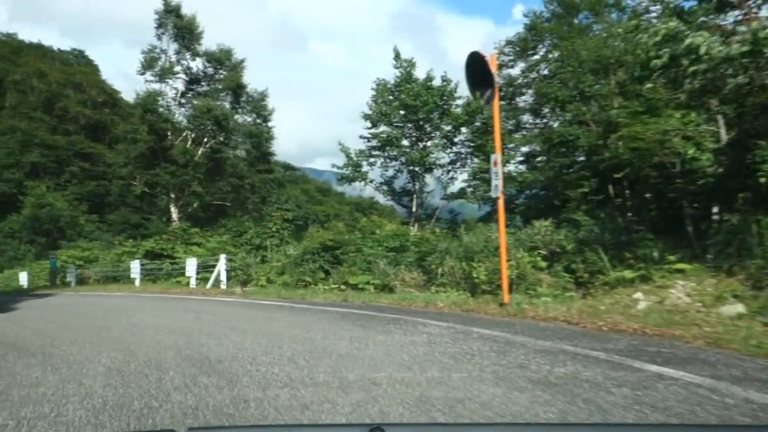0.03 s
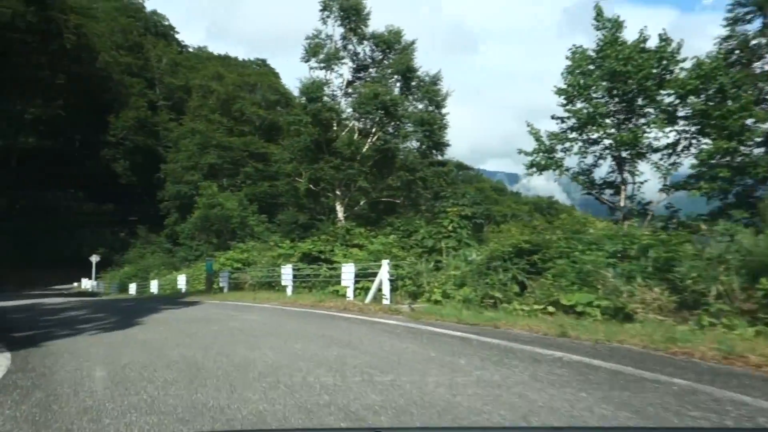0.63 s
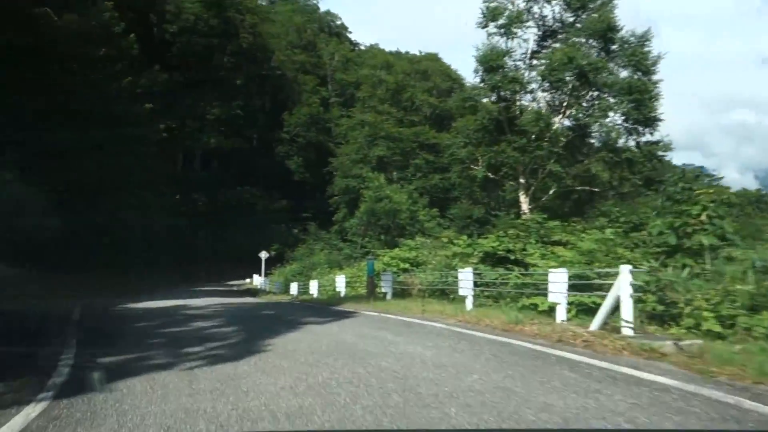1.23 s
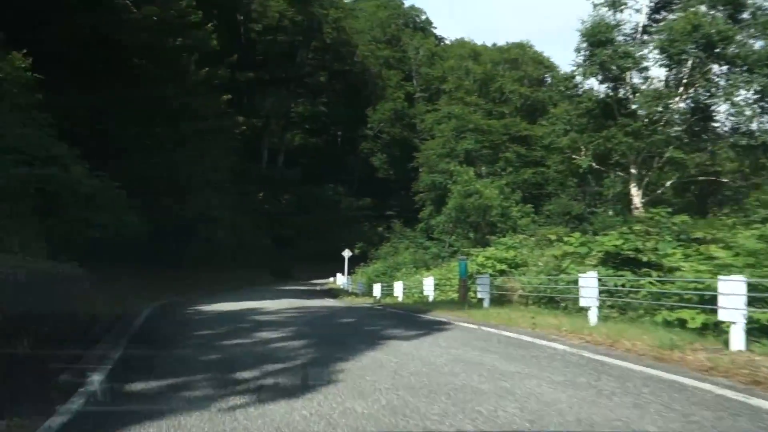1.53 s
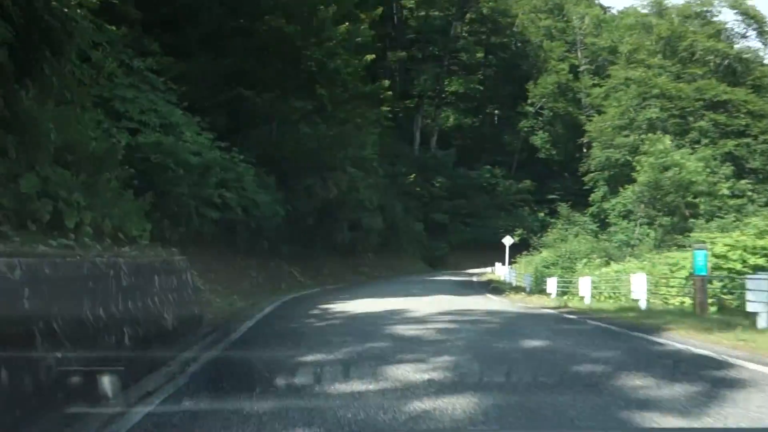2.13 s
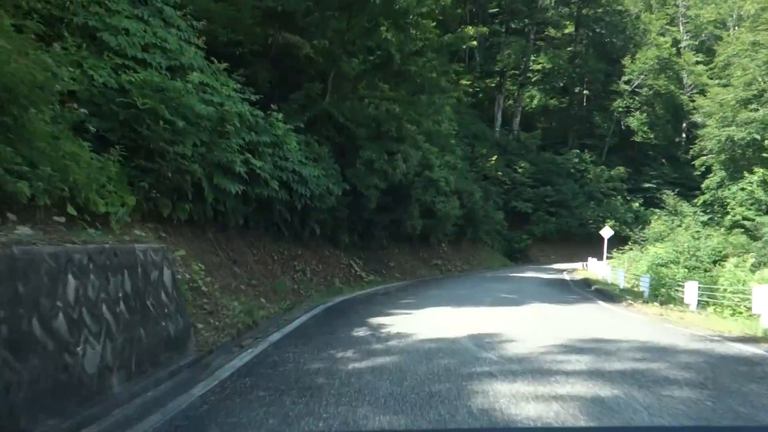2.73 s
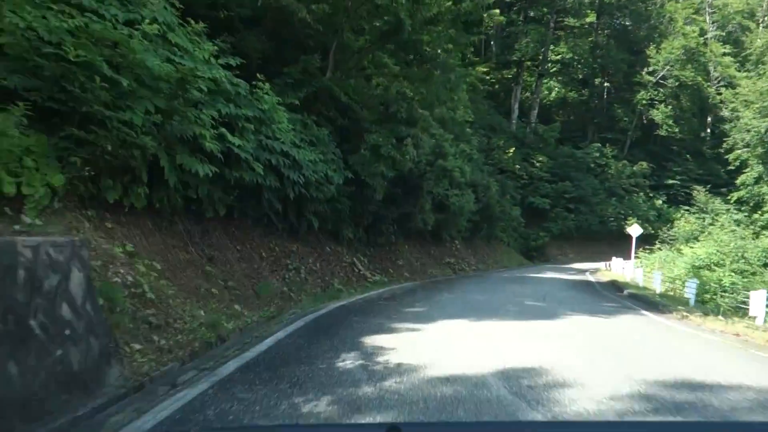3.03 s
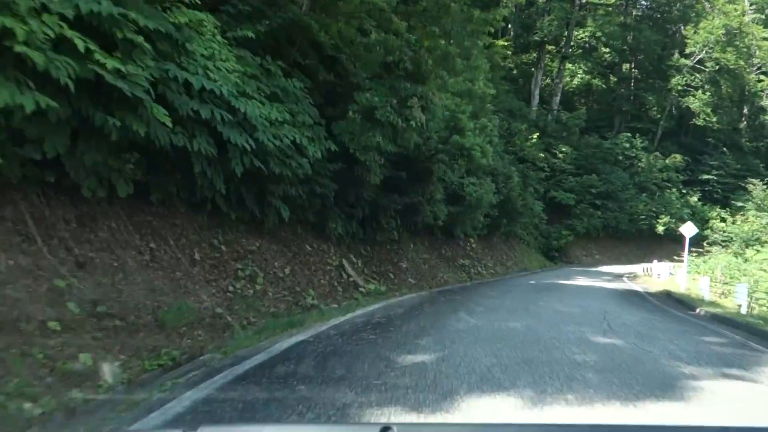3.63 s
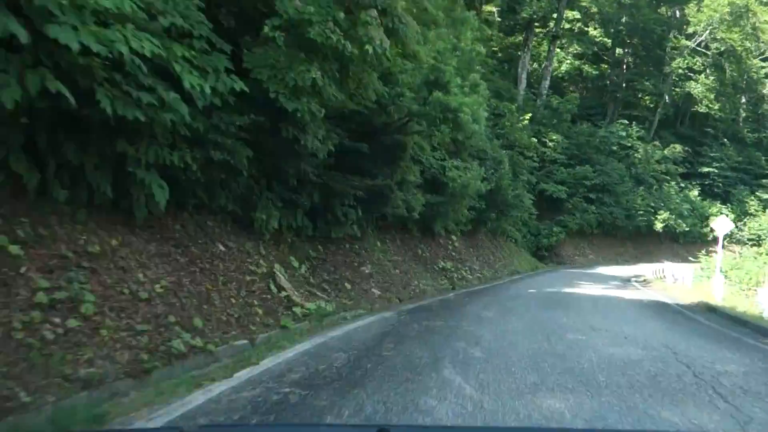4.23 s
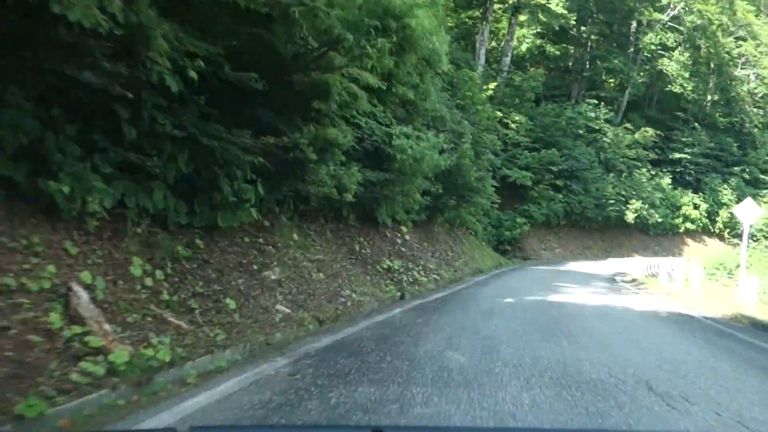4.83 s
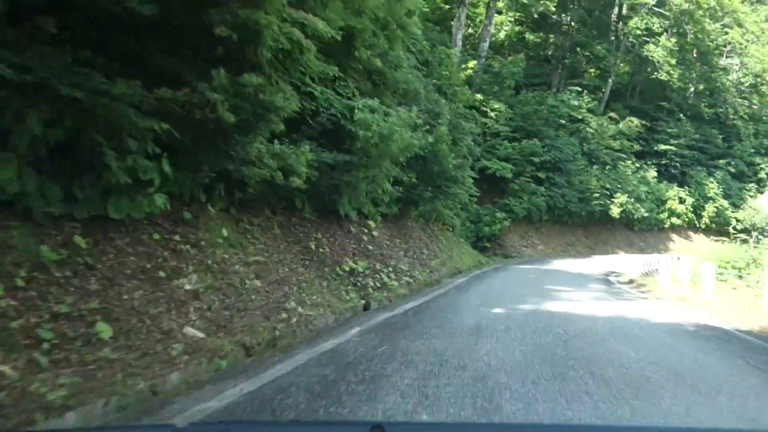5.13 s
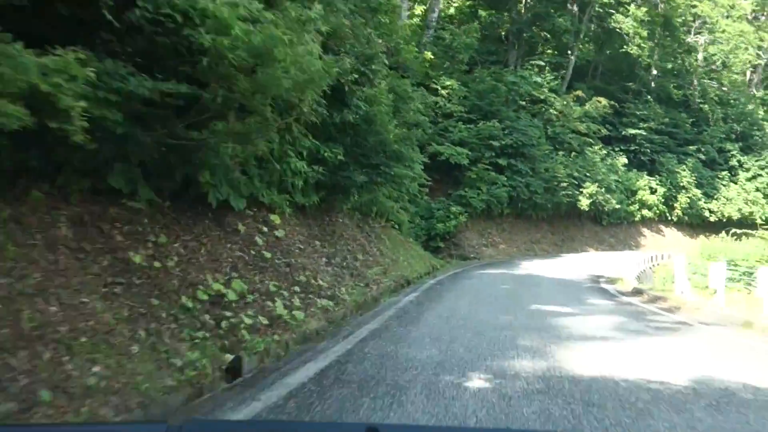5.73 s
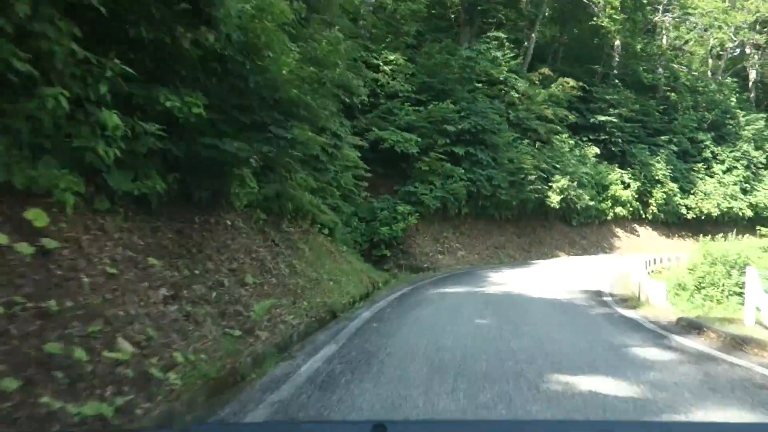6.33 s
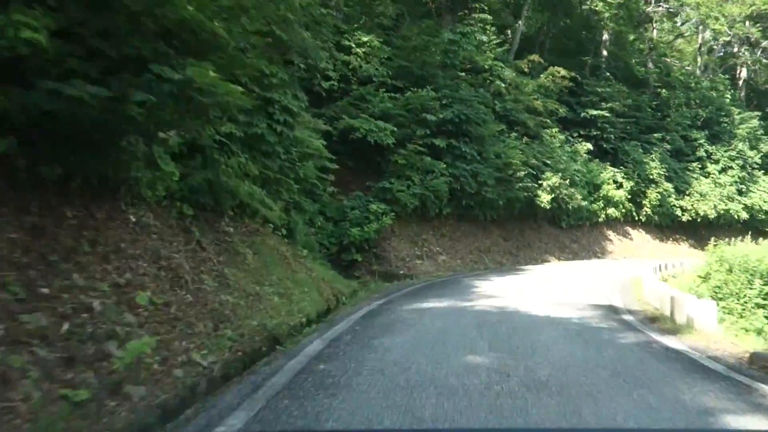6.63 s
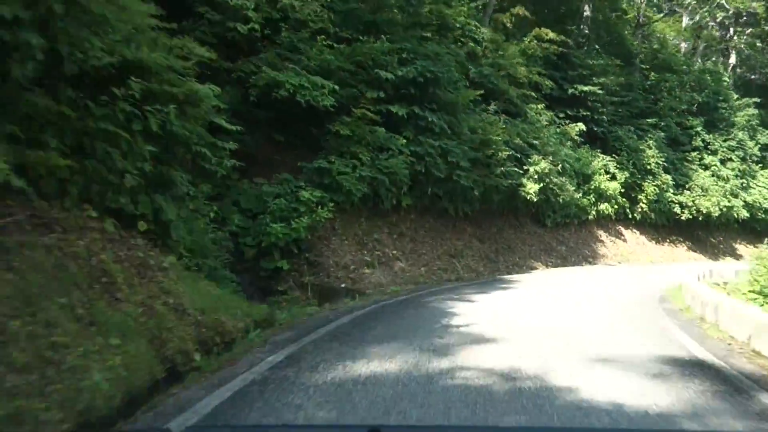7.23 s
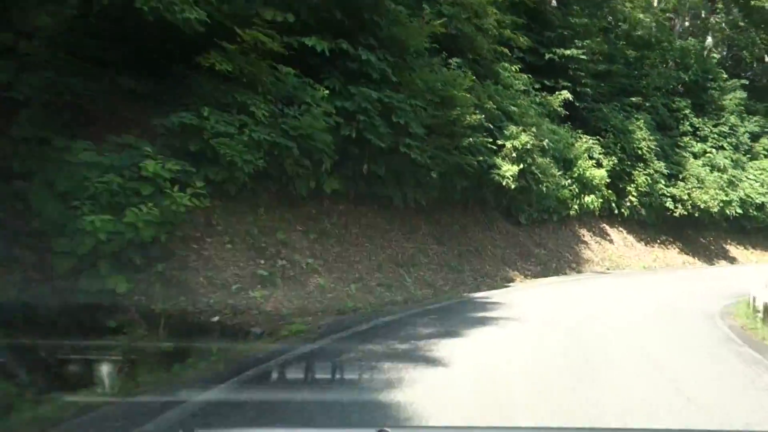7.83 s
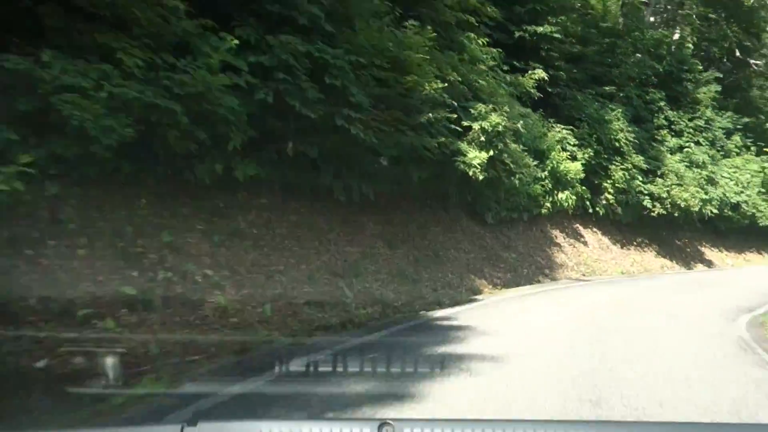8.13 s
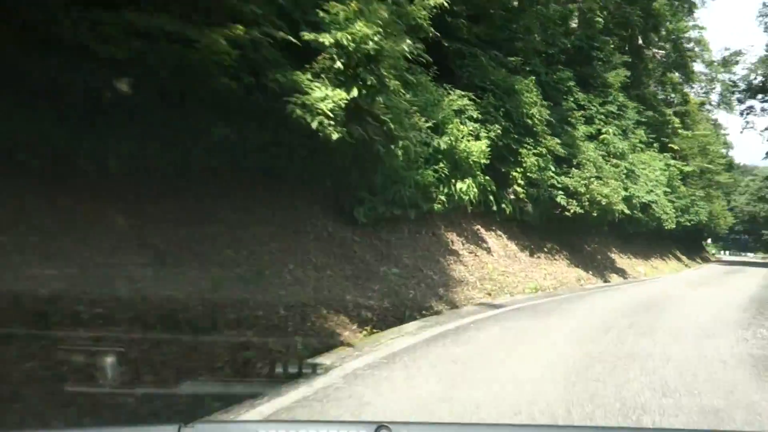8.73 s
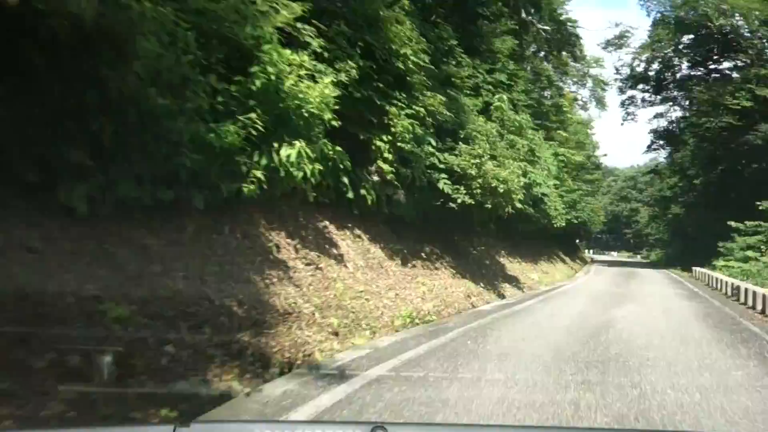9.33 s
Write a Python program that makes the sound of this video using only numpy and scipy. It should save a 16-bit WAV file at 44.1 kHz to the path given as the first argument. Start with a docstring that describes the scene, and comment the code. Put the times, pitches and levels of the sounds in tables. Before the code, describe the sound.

Inside a car, rough asphalt booms steadily under a soft engine hum while trim ticks and a loose object briefly rattles.

```python
"""Inside a small car on a winding forest road. Rough asphalt booms in the cabin air and shakes the body
and panels; the tire treads roar, the air in the tires rings, and the engine hums underneath.
A loose object knocks, mostly on a bumpy stretch, plastic trim ticks and creaks as its joints slip,
and hands slide on the steering wheel in the bends, over a faint hiss of air."""
import sys
import numpy as np
from scipy.fft import rfft, irfft, next_fast_len
from scipy.io import wavfile
from scipy.ndimage import uniform_filter1d, map_coordinates

SR = 44100
rng = np.random.default_rng(int(sys.argv[2]) if len(sys.argv) > 2 else 0)


def store_wav(level_fs):
    """Save 16-bit WAV to argv[1]."""
    pcm = np.round(np.clip(np.atleast_2d(level_fs), -1, 1) * 32767)
    wavfile.write(sys.argv[1], SR, pcm.T.astype(np.int16))


N = 423360  # 9.6 s


def amp(db):
    """dB to gain."""
    return 10 ** (np.asarray(db) / 20)


def unit(x):
    """Scale to rms 1."""
    return x / np.sqrt(np.mean(x ** 2) + 1e-20)


def shaped(points):
    """Gain function of (freq_hz, level_db) points, log frequency axis."""
    freq_hz, level_db = np.transpose(points)
    return lambda hz: amp(np.interp(np.log(hz + 1), np.log(freq_hz + 1), level_db))


def resonant(modes, skirt):
    """Gain function of independent (freq_hz, width_hz, level_db) modes; more skirt, deeper valleys."""
    def gain(hz):
        power = 0
        for freq_hz, width_hz, level_db in modes:
            detune = (hz ** 2 - freq_hz ** 2) / ((hz + 1) * width_hz)
            power += amp(level_db) ** 2 / (1 + detune ** 2) ** skirt
        return np.sqrt(power)
    return gain


def curves(rows):
    """Per-sample curve for each column after time_s."""
    time_s, *columns = np.transpose(rows)
    return [np.interp(np.arange(N) / SR, time_s, column) for column in columns]


def wobble(rate_hz):
    """Smooth random curve, rate_hz knots per second."""
    knots = rng.standard_normal(int(N * rate_hz / SR) + 4)
    return map_coordinates(knots, [np.arange(N) * rate_hz / SR])


def filtered(x, response):
    """Zero-phase FFT filter."""
    size = x.shape[-1]
    padded = next_fast_len(size + 8192)
    spectrum = rfft(x, padded) * response(np.fft.rfftfreq(padded, 1 / SR))
    return irfft(spectrum, padded)[..., :size]


def steadied(x, span_s):
    """Even out swells slower than span_s."""
    power = uniform_filter1d(np.mean(x ** 2, 0), max(int(span_s * SR), 1))
    return x / np.sqrt(np.abs(power) + 1e-9)


def gliding(x, ratio):
    """Bend pitch by a per-sample ratio."""
    position = np.cumsum(ratio)
    return np.array([map_coordinates(side, [position], order=1, mode="mirror") for side in x])


def contact(t, t60_s, echo_db, echo_t60_s):
    """Envelope of a short contact plus its weak cabin echo."""
    return amp(-60 * t / t60_s) + amp(echo_db - 60 * t / echo_t60_s)


def panned(x, left_db):
    """Set left level re right."""
    return x * amp([[left_db / 2], [-left_db / 2]])


def add(track, start_s, sound):
    """Mix sound into track at start_s."""
    part = track[:, max(round(start_s * SR), 0):][:, :sound.shape[-1]]
    part += sound[..., :part.shape[-1]]


# cabin stereo width: freq_hz, side_re_mid_db
STEREO_WIDTH = [(30, -36), (80, -51), (160, -35), (330, -23), (650, -15), (1300, -7.5), (2600, -4),
                (5000, 0), (9000, 3), (14000, 1)]


def noise(gain, size=N):
    """Diffuse cabin noise, rms 1: sides alike in the bass, unrelated in the treble."""
    def response(hz):
        spread = np.arctan(shaped(STEREO_WIDTH)(hz))
        return gain(hz) * np.array([np.cos(spread), np.sin(spread)])
    mid, side = filtered(rng.standard_normal((2, size)), response)
    return unit(np.array([mid + side, mid - side]))


# cabin air modes, both tables: freq_hz, width_hz, level_db
LENGTHWISE_MODES = [(88, 6, -3), (95.5, 9.5, 10.5), (110.5, 21.6, 3)]
CROSSWISE_MODES = [(144.7, 14, -6), (163.6, 9.8, -3), (177, 8.8, -8.5)]


def cabin_boom(coarse_db, lengthwise_lift_db, crosswise_lift_db):
    """Asphalt, bumps and small undulations drive the cabin air modes."""
    uneven_db, uneven_hz = 1.34, 8
    lengthwise_db = -38 + 0.79 * coarse_db + lengthwise_lift_db + uneven_db * wobble(uneven_hz)
    crosswise_db = -37 + 0.55 * coarse_db + crosswise_lift_db + uneven_db * wobble(uneven_hz)
    lengthwise = steadied(noise(resonant(LENGTHWISE_MODES, skirt=1.34)), span_s=0.14)
    crosswise = steadied(noise(resonant(CROSSWISE_MODES, skirt=1.43)), span_s=0.16)
    return amp(lengthwise_db) * lengthwise + amp(crosswise_db) * crosswise


# body panel modes: freq_hz, width_hz, level_db
PANEL_MODES = [(205.8, 23, 1.5), (240, 20, 0), (276, 27, -5), (326, 25.6, .5), (349.6, 13, 2),
               (404.8, 50, -2.5), (487, 79, -13.5)]


def body_panels(coarse_db, jolt_db, texture):
    """Road vibration rings the body panels."""
    level_db = -36 + coarse_db + 0.091 * jolt_db + 0.5 * texture
    return amp(level_db) * steadied(noise(resonant(PANEL_MODES, skirt=1.33)), span_s=0.11)


# tire air resonance: time_s, pitch_hz, level_db
CAVITY_TRACK = [(1.8, 237.8, -55), (2.7, 245.1, -43), (3.65, 242.3, -42.5), (4.3, 239.9, -53),
                (4.85, 243, -38.5), (6.1, 240.4, -48.5), (7.0, 244.6, -43), (7.9, 241.6, -40),
                (9.1, 237.3, -34.5), (9.6, 237.2, -43)]


def tire_cavity():
    """Air in the tires rings, drifting with wheel speed and load."""
    pitch_hz, level_db = curves(CAVITY_TRACK)
    mean_hz = pitch_hz.mean()
    ring = noise(resonant([(mean_hz, 8, 0)], skirt=1.9))
    return amp(level_db) * steadied(gliding(ring, pitch_hz / mean_hz), span_s=0.34)


# tread noise through the glass: freq_hz, density_db
TREAD_SPECTRUM = [(250, -18.5), (440, -2), (540, 0.5), (660, 0), (820, -2), (1000, -4.5), (1300, -10.5),
                  (1620, -16.5), (2100, -24), (3300, -42), (5000, -46)]
# narrow tread tones: freq_hz, width_hz, level_db
TREAD_PEAKS = [(784, 30, -10), (1106, 27, 0)]
# tread block hum: time_s, level_db
BLOCK_HUM = [(0, -54), (4, -57.5), (6.7, -52.5), (7.2, -65), (8.1, -61), (8.6, -44), (8.9, -58),
             (9.15, -44.5), (9.45, -56)]


def tire_tread(coarse_db, texture):
    """The tread roars on the asphalt; its blocks hum, most in the last bend."""
    roar_db = -45 + 0.68 * coarse_db + 1.2 * texture
    hum_db, = curves(BLOCK_HUM)
    roar = noise(shaped(TREAD_SPECTRUM)) + amp(-17.5) * noise(resonant(TREAD_PEAKS, skirt=2.7))
    hum = steadied(noise(resonant([(603.5, 38, 0)], skirt=2.0)), span_s=0.2)
    return panned(amp(roar_db) * roar + amp(hum_db) * hum, left_db=1.4)


# body bounce modes: freq_hz, width_hz, level_db
BOUNCE_MODES = [(29, 8, 1), (44, 12, 9), (56, 20, 1)]


def body_shake(coarse_db, jolt_db):
    """The body bounces on its springs and mounts."""
    level_db = -49 + 0.65 * coarse_db + 0.23 * jolt_db
    return amp(level_db) * steadied(noise(resonant(BOUNCE_MODES, skirt=1.28)), span_s=0.2)


# road bumps: peak_s, lengthwise_db, crosswise_db
ROAD_BUMPS = [(.16, 1, 10.5), (.44, -2, 10), (.65, 4.5, 1.5), (.75, 1.5, 9), (.96, -2, 4), (1.13, -3, 5),
              (1.52, 6.5, 9), (1.79, 4, 2), (2.46, 11, 3.5), (3.07, 4.5, -1), (4.33, 2.5, 2), (4.55, -6, 6),
              (4.79, 7, 1.5), (5.2, 3, 3), (5.33, -1, 7), (6.1, 3.5, -3), (6.2, -5, 6), (6.4, -6, 4.5),
              (7.02, -6, 4), (7.19, 4, 3.5), (7.78, 4, 6.5), (8.0, 4.5, 7.5), (8.38, -2.5, 6.5),
              (9.17, 4.5, 10), (9.48, -4, 8.5)]


def bumps(rise_s=0.075, fall_s=0.11):
    """Each bump briefly shifts the level of the two sets of air modes."""
    t = np.arange(N) / SR
    lengthwise_lift_db, crosswise_lift_db = np.zeros((2, N))
    for peak_s, lengthwise_db, crosswise_db in ROAD_BUMPS:
        ramp = 1 + np.minimum((t - peak_s) / rise_s, (peak_s - t) / fall_s)
        swell = np.sin(np.pi / 2 * np.clip(ramp, 0, 1))
        lengthwise_lift_db += lengthwise_db * swell
        crosswise_lift_db += crosswise_db * swell
    return lengthwise_lift_db, crosswise_lift_db


# asphalt coarseness re an ordinary stretch: time_s, coarse_db
ASPHALT = [(0.1, -2), (0.8, 0.5), (1.85, 0.3), (2.3, -2.5), (4.0, -1.5), (5.1, 0.1), (6.3, -0.8), (6.9, 1),
           (7.4, 1.5), (7.7, 2), (8.35, 5.5), (9.6, 2)]


def road():
    """The road surface drives cabin air, panels, tires and springs."""
    coarse_db, = curves(ASPHALT)
    lengthwise_lift_db, crosswise_lift_db = bumps()
    jolt_db = (lengthwise_lift_db + crosswise_lift_db) / 2
    texture = wobble(22)  # patches of coarser asphalt
    return (cabin_boom(coarse_db, lengthwise_lift_db, crosswise_lift_db)
            + body_panels(coarse_db, jolt_db, texture)
            + tire_cavity()
            + tire_tread(coarse_db, texture)
            + body_shake(coarse_db, jolt_db))


# engine speed and load: time_s, firing_hz, relative_db
ENGINE_TRACK = [(0.1, 53.5, -31.5), (.45, 54.2, -31.5), (.8, 52.5, -35.5), (1.15, 50.5, -38),
                (1.85, 49, -33), (2.3, 47.5, -50), (7.2, 48.5, -47.5), (8.3, 52.5, -33.5), (9.1, 50.5, -35),
                (9.6, 51.5, -39)]
# engine orders: firing_multiple, relative_db
ENGINE_ORDERS = [(2, -18), (3, -4), (4, -12.5)]


def engine():
    """Firing harmonics, slightly unsteady, louder under load."""
    firing_hz, hum_db = curves(ENGINE_TRACK)
    phase = 2 * np.pi * np.cumsum(firing_hz * (1 + 0.0144 * wobble(12))) / SR
    hum = sum(amp(db + 1.4 * wobble(27)) * np.sin(multiple * phase) for multiple, db in ENGINE_ORDERS)
    return amp(hum_db - 2) * unit(hum)


# knocks: start_s, relative_db, crack_re_ring_db, most_excited_hz
OBJECT_KNOCKS = [(0.713, -44, -12, 2450), (0.721, -37.5, -22, 1260), (4.93, -43, -12, 1400),
                 (5.496, -40.5, 0, 2100), (8.026, -42, 0, 3000), (8.047, -23, -19, 1730),
                 (8.052, -31, -8, 3200), (8.069, -33, -20, 2000), (8.082, -36, -14, 1150),
                 (8.287, -30, -11, 2400), (8.293, -31.5, -18, 1270), (8.308, -33, -10, 2800),
                 (8.328, -41, -4, 1300), (8.339, -41, -12, 1800)]
# hard plastic shell modes: freq_hz, relative_db, t60_s
SHELL_MODES = [(1208, 9, 0.054), (1440, 4, 0.037), (1775, 1, 0.043), (2000, -8, .045), (2440, -6, 0.055),
               (2850, -10, .06), (3400, -4.5, 0.09)]
# panel under the object: freq_hz, width_hz, level_db
THUD_MODES = [(980, 420, 0)]


def loose_object(thud_db=-10, thud_t60_s=0.07, attack_s=0.00046):
    """Each knock is a crack, a panel thud and a shell ring; where it lands sets which modes ring most."""
    out, t = np.zeros((2, N)), np.arange(SR // 5) / SR
    attack = 1 - np.exp(-t / attack_s)
    for start_s, knock_db, crack_db, most_excited_hz in OBJECT_KNOCKS:
        ring = 0
        for freq_hz, mode_db, t60_s in SHELL_MODES:
            chatter = np.cumsum(rng.normal(0, 0.04, len(t)))  # chatter on the panel blurs the mode
            phase = rng.uniform(0, 2 * np.pi) + rng.normal(0, 0.55, (2, 1)) + chatter
            strength_db = mode_db - 32 * abs(np.log2(freq_hz / most_excited_hz)) + rng.normal(0, 1)
            ring += amp(strength_db - 60 * t / t60_s) * np.sin(2 * np.pi * freq_hz * t + phase)
        crack = noise(resonant([(3550, 3700, 0)], skirt=1), size=len(t))
        crack *= amp(crack_db) * contact(t, t60_s=0.056, echo_db=-14, echo_t60_s=0.11)
        thud = noise(resonant(THUD_MODES, skirt=1.8), size=len(t)) * amp(thud_db - 60 * t / thud_t60_s)
        add(out, start_s, amp(knock_db - 4) * (ring + crack + thud) * attack)
    return out


# trim creaks, plus the bright crackle of the loose object's knock at 8.29 s: start_s, length_s (0 = one tick),
# level_db, pitch_hz, width_hz
TRIM_CREAKS = [(1.279, .025, -45, 3550, 900), (2.331, .027, -52, 4300, 2200), (2.437, 0, -47, 4300, 2600),
               (2.47, .052, -46, 3600, 2600), (2.497, .03, -49, 2100, 1500), (2.669, 0, -48.5, 7200, 1500),
               (2.75, .028, -47, 3800, 4200), (2.891, 0, -51, 8600, 2500), (3.407, 0, -55, 4200, 2200),
               (3.507, .045, -51, 4200, 3200), (3.561, 0, -49, 4400, 3600), (3.562, .02, -54, 5560, 220),
               (3.59, 0, -52, 5500, 1200), (3.619, .064, -48.5, 4000, 3600), (3.648, .035, -54, 5620, 300),
               (3.72, 0, -44, 8000, 9000), (3.746, 0, -53, 6500, 4000), (5.233, .016, -49.5, 3700, 2000),
               (5.307, 0, -52, 9000, 6000), (5.319, 0, -48.5, 3700, 1800), (5.494, 0, -45, 5700, 2200),
               (5.81, 0, -49, 12500, 7000), (5.953, 0, -48, 13000, 1500), (6.052, 0, -53, 5000, 1800),
               (6.113, .01, -47, 6430, 1800), (7.134, 0, -49.5, 4000, 2400), (7.64, 0, -46, 13000, 1200),
               (7.688, 0, -45, 13000, 2500), (7.963, 0, -44, 8000, 9000), (7.993, .012, -42, 13300, 4500),
               (8.117, .025, -49, 12000, 2500), (8.288, .026, -43.5, 10000, 9000),
               (8.362, .01, -45, 7500, 4000), (8.685, 0, -50, 4480, 2000), (9.425, 0, -46.5, 6400, 5000)]


def trim(slip_gap_s=0.012, slip_rise_s=0.0021, scatter_db=1.7, max_slips=10):
    """Plastic joints creak in uneven runs of tiny slips, each joint at its own pitch; the same slips give the
    bright crackle of the knock at 8.29 s."""
    out, t = np.zeros((2, N)), np.arange(SR // 4) / SR
    for start_s, length_s, level_db, pitch_hz, width_hz in TRIM_CREAKS:
        gaps_s = slip_gap_s * np.exp(rng.normal(0, 0.2, max_slips))
        delays_s = np.cumsum(gaps_s) - gaps_s[0]
        sizes = amp(rng.normal(0, scatter_db, max_slips)) * (delays_s <= length_s)
        age_s = np.maximum(t - delays_s[:, None], 0)
        attack = 1 - np.exp(-age_s / slip_rise_s)
        slips = attack * contact(age_s, t60_s=0.031, echo_db=-12, echo_t60_s=0.094)
        envelope = np.sqrt(sizes ** 2 @ slips ** 2)  # slips add in power
        joint = noise(resonant([(pitch_hz, width_hz, 0)], skirt=1.56), size=len(t))
        stutter = amp(2.3 * wobble(420)[:len(t)])
        add(out, start_s, amp(level_db) * joint * stutter * envelope)
    return panned(out, left_db=-3)


# hand strokes: start_s, end_s, rise_s, fall_s, level_db
HAND_STROKES = [(0.76, 1.15, 0.16, 0.16, -52.2), (1.238, 1.753, 0.13, 0.2, -56),
                (1.706, 1.994, 0.17, .08, -56), (2.943, 3.08, 0.055, .07, -62),
                (4.899, 4.98, .02, 0.052, -56), (5.464, 5.66, 0.024, .12, -60.5),
                (5.757, 6.04, 0.037, 0.081, -60), (7.11, 7.86, 0.13, 0.13, -55.8),
                (7.954, 8.184, 0.019, 0.11, -53.5), (8.253, 8.46, 0.043, 0.2, -49.5)]
# skin and cloth friction: freq_hz, density_db
RUB_SPECTRUM = [(900, -8), (2000, 0), (3200, 4), (4500, 2.8), (6300, 6.2), (10000, 4.3), (13000, 2)]
# plastic steering wheel modes: freq_hz, width_hz, level_db
WHEEL_MODES = [(3050, 300, -7), (3590, 280, 3), (5170, 240, 1)]


def hands():
    """Palms and sleeves slide with a fine, uneven grain, colored by the wheel's modes."""
    def rub_gain(hz):
        wheel = np.hypot(1, 1.8 * resonant(WHEEL_MODES, skirt=1.2)(hz))
        return shaped(RUB_SPECTRUM)(hz) * wheel
    envelope, t = np.zeros(N), np.arange(N) / SR
    for start_s, end_s, rise_s, fall_s, level_db in HAND_STROKES:
        ramp = np.minimum((t - start_s) / rise_s, (end_s - t) / fall_s)
        envelope += amp(level_db) * np.clip(ramp, 0, 1)
    grain = unit(amp(2.2 * wobble(400) + 1.3 * wobble(27)))
    return panned(envelope * grain * noise(rub_gain), left_db=-2.1)


# air hiss spectrum: freq_hz, density_db
HISS_SPECTRUM = [(800, 3), (2200, 6), (3300, 7), (4400, -0.5), (7000, 0), (10000, -1), (12500, -3.5)]
# air hiss level: time_s, level_db
HISS_LEVEL = [(0, -57.5), (0.7, -59.5), (2.6, -57.5), (4.3, -61.5), (6, -59.5), (6.8, -62.5), (7.3, -59.5),
              (8.4, -55.5), (9.6, -63)]


def air():
    """Faint, smooth hiss of moving air."""
    level_db, = curves(HISS_LEVEL)
    return panned(amp(level_db + 1.4 * wobble(6.1)) * noise(shaped(HISS_SPECTRUM)), left_db=-2)


def scene():
    """Mix at the front seats."""
    return road() + engine() + loose_object() + trim() + hands() + air()


def record(dry):
    """Brief silence, fast fade-in, steep low-pass."""
    start_s, fade_s, cutoff_hz = 0.077, 0.002, 15450
    fade_in = np.clip((np.arange(N) / SR - start_s) / fade_s, 0, 1)
    return filtered(dry * fade_in, lambda hz: 1 / np.sqrt(1 + (hz / cutoff_hz) ** 500))


dry = scene()
out = record(dry)
store_wav(out)
```